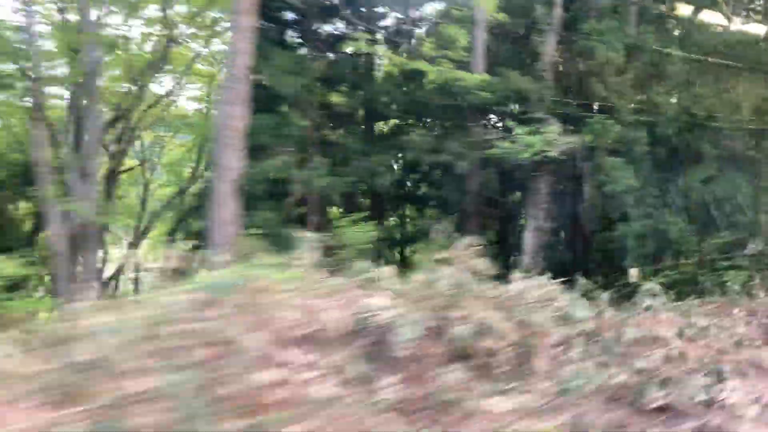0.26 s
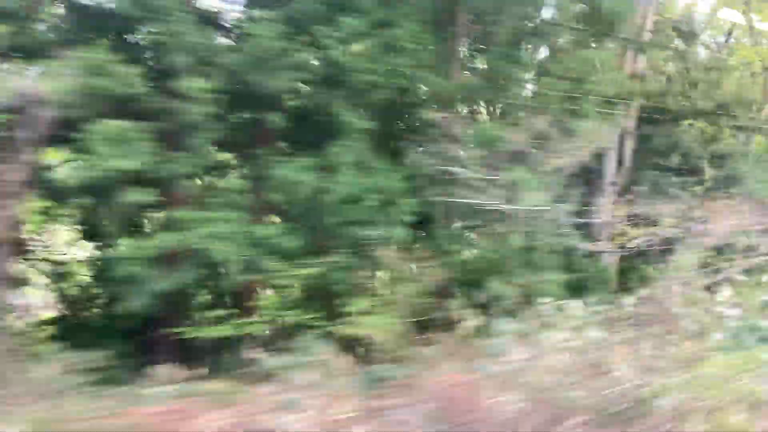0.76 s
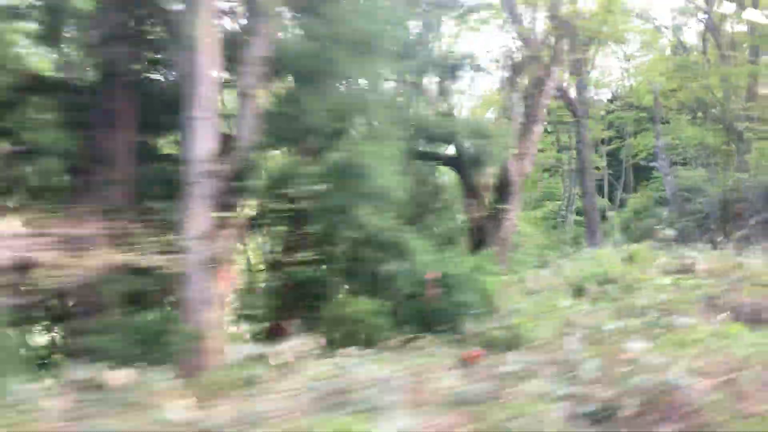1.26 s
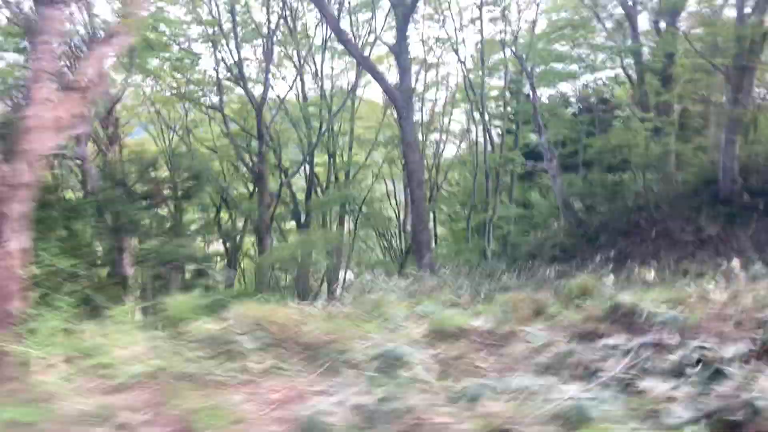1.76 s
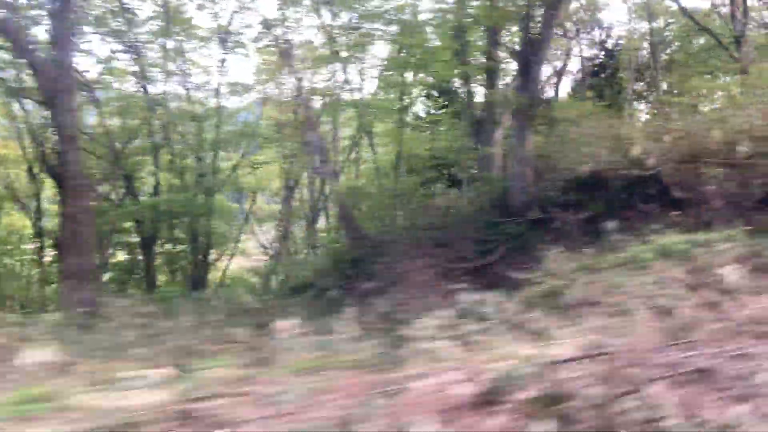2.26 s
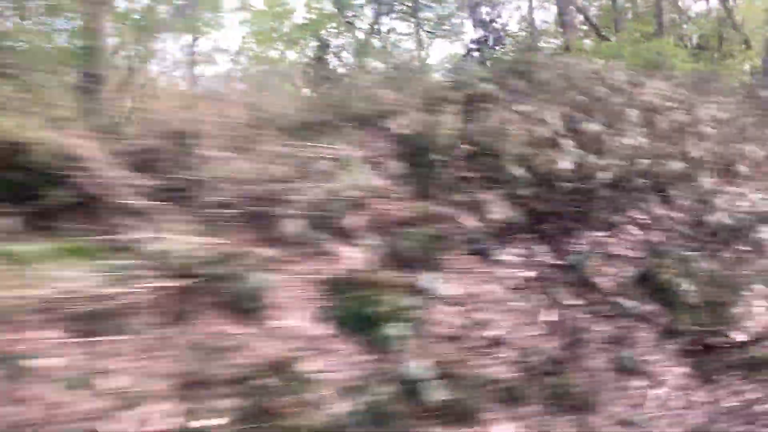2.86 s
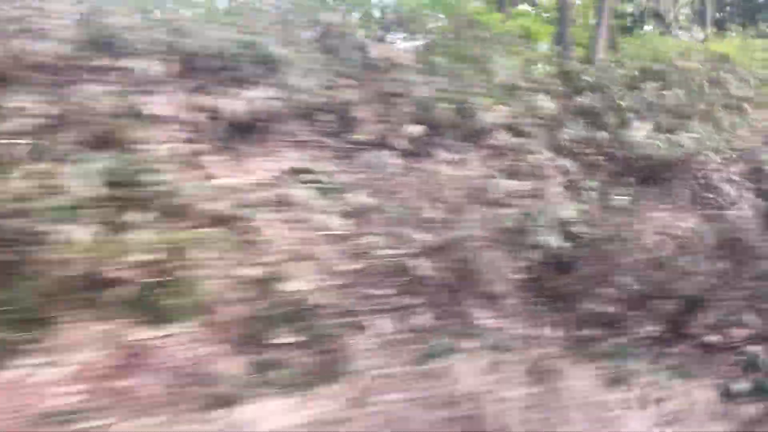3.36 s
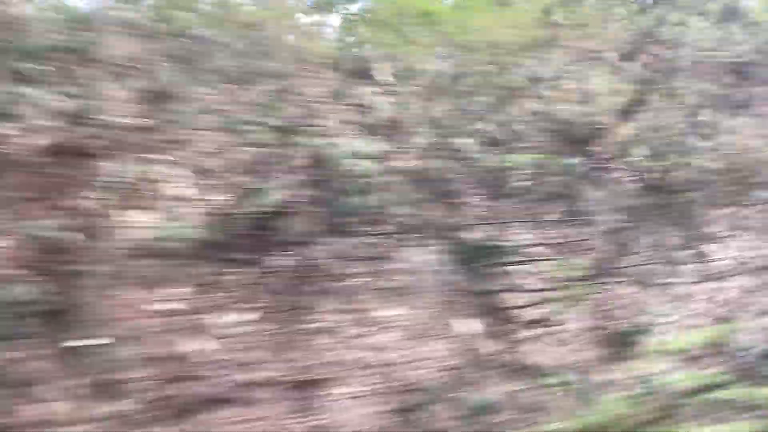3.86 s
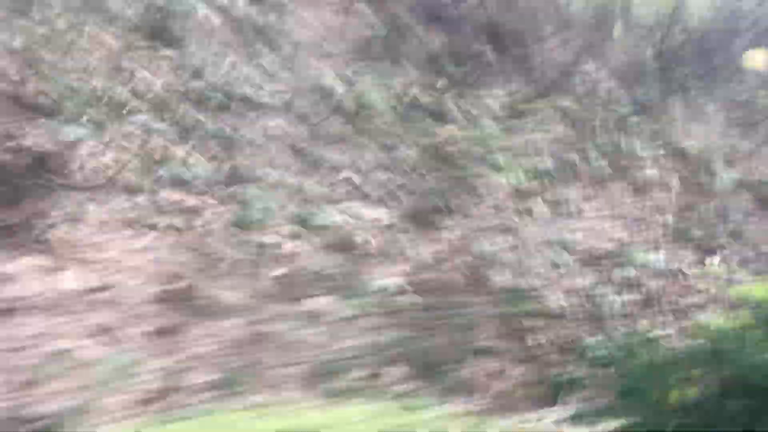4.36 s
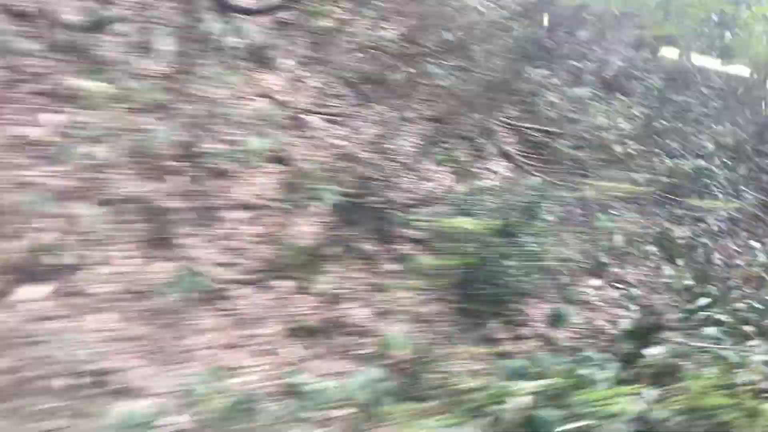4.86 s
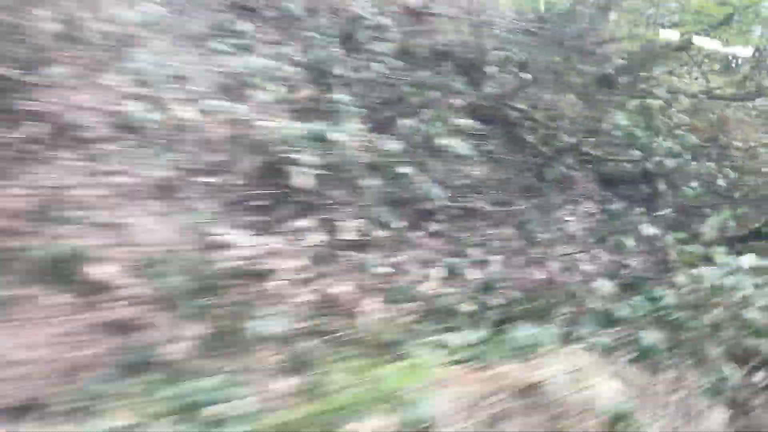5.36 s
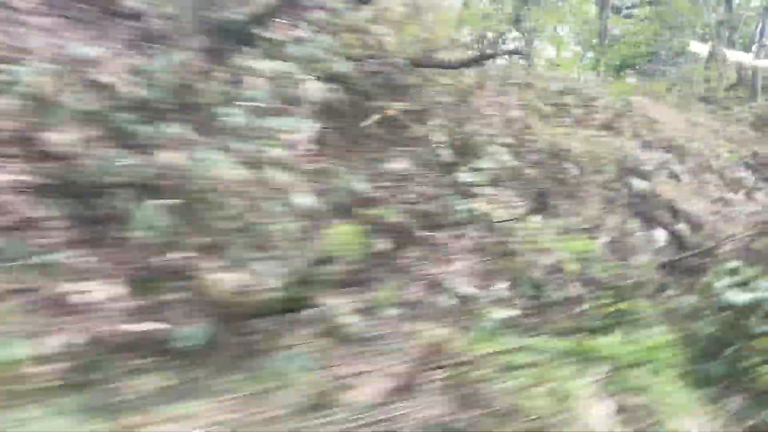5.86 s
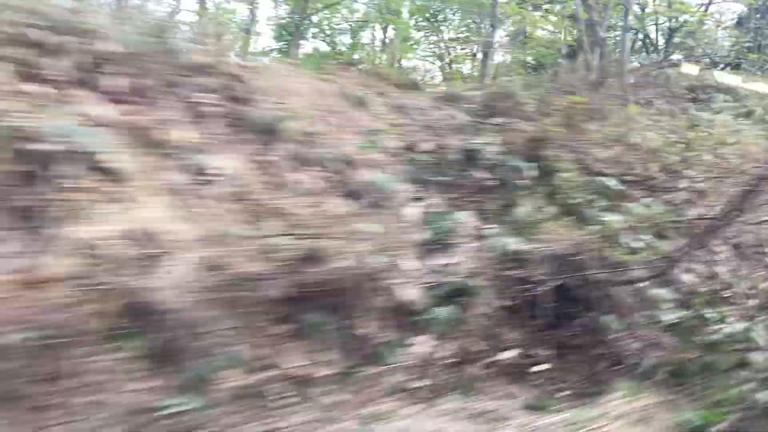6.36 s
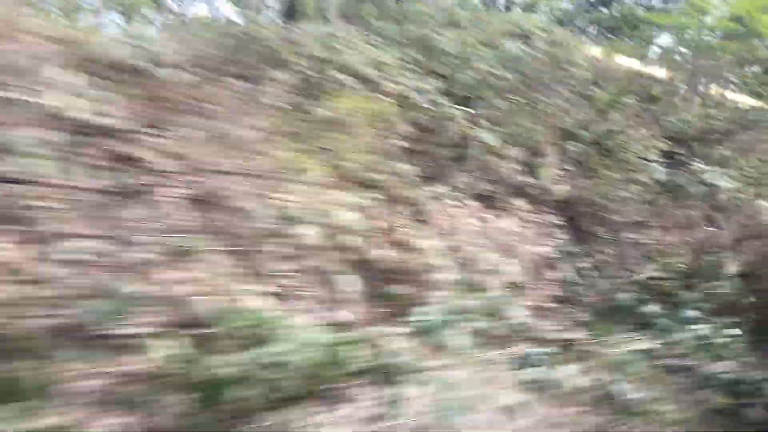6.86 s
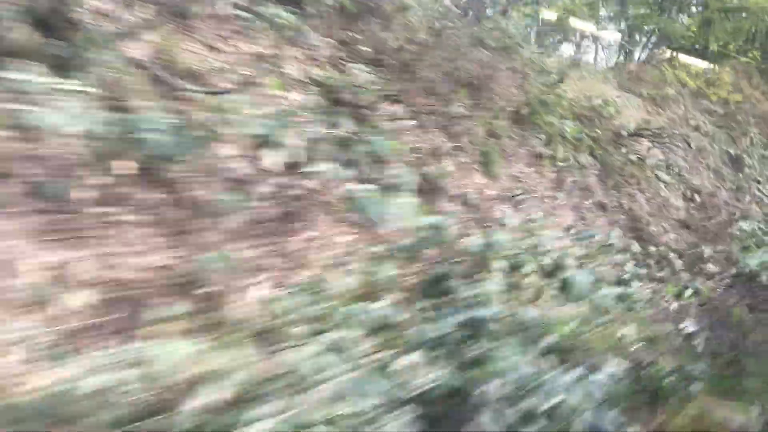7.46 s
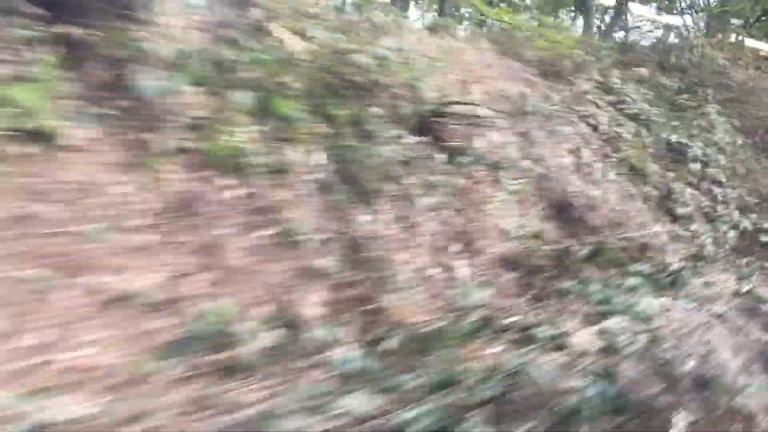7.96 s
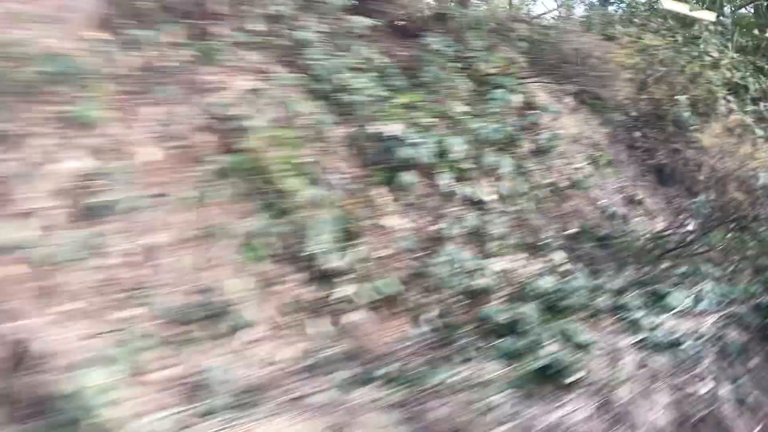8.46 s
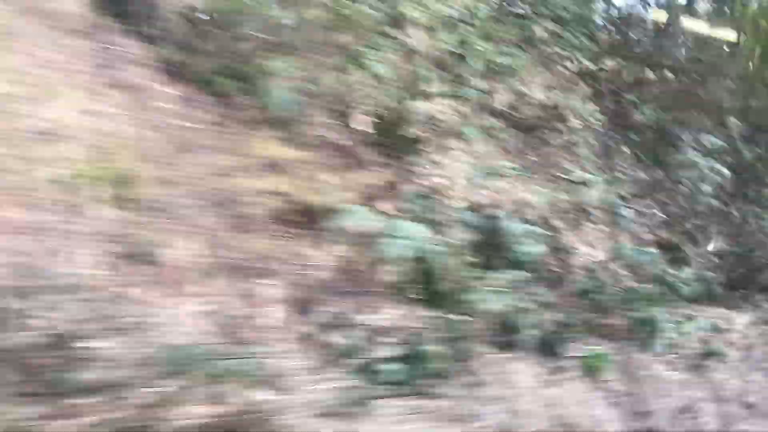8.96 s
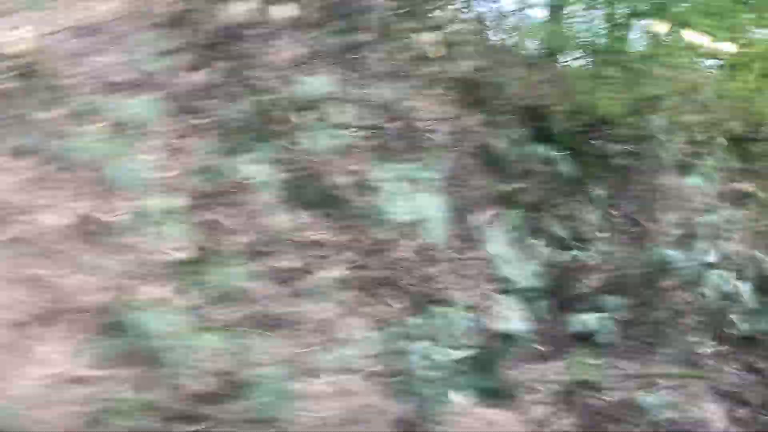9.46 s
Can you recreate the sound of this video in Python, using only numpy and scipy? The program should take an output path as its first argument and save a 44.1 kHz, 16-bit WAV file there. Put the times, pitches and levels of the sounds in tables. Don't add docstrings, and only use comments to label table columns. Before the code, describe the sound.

Inside a rolling electric train carriage, a phone held at the window picks up constant low rumble, wheel roar, soft hiss and an unsteady drive hum. Paired axle thuds over rail joints recur, with light trim rattle and faint squeaks. After three seconds a quick cluster of hard knocks hits the glass, momentarily dipping the background; a lone knock follows at six and a duller one past nine.

```python
import sys
import numpy as np
from scipy import signal
from scipy.fft import rfft, irfft, next_fast_len
from scipy.io import wavfile
from scipy.ndimage import uniform_filter1d, map_coordinates

SR = 44100
rng = np.random.default_rng(int(sys.argv[2]) if len(sys.argv) > 2 else 0)


def persist_wave(psi):
    counts = np.round(np.clip(psi, -1, 1) * 32767).astype(np.int16)
    wavfile.write(sys.argv[1], SR, np.atleast_2d(counts).T)


def convert_level_to_amplitude(level_db):
    exponent = np.asarray(level_db, float) / 20
    return 10 ** exponent


N = 428211

# (frequency [Hz], likeness [0..1])
LIKENESS = [(60, 0.95), (700, 0.85), (1000, 0.64), (1600, 0.33), (2300, 0.05), (4800, 0.027), (5600, 0.6),
            (7000, .85), (8800, 1)]
# (time [s], crack [dB], pitch factor [1], duck [dB], hold [s])
HARD_KNOCKS = [
    (3.068, -10, 0.99, 1.5, .05),
    (3.227, -3, 0.94, 7.5, 0.1),
    (3.359, -13, 0.84, 2, 0.063),
    (3.568, -2.5, 0.98, 6, .13),
    (3.7011, -2, 0.93, 9, 0.12),
    (6.142, -4.5, 0.96, 8, 0.075),
]


def unit(x):
    return x / np.sqrt(np.mean(x ** 2) + 1e-20)


def along(points, hz):
    f, v = np.transpose(points)
    return np.interp(np.log(hz + 1), np.log(f + 1), v)


def curves(rows):
    s, *cols = np.transpose(rows)
    return [np.interp(np.arange(N) / SR, s, c) for c in cols]


def wobble(rate):
    knots = rng.standard_normal(int(N * rate / SR) + 4)
    return map_coordinates(knots, [np.arange(N) * rate / SR])


def filtered(x, response):
    m = next_fast_len(N + 8192)
    return irfft(rfft(x, m) * response(np.fft.rfftfreq(m, 1 / SR)), m)[..., :N]


def diffuse_angle(hz):
    return np.arccos(np.clip(along(LIKENESS, hz), -1, 1)) / 2


def rush(spectrum, patchy_db):
    z = signal.stft(rng.standard_normal((2, N)), nperseg=512)[2]
    field = uniform_filter1d(rng.standard_normal(z.shape[1:]), size=4, axis=0)
    field = uniform_filter1d(field, size=10, axis=1)
    pair = signal.istft(z * convert_level_to_amplitude(patchy_db * unit(field)), nperseg=512)[1][:, :N]

    def response(hz):
        angle = diffuse_angle(hz)
        return convert_level_to_amplitude(along(spectrum, hz)) * [np.cos(angle), np.sin(angle)]

    mid, side = filtered(pair, response)
    return unit(np.array([mid + side, mid - side]))


def tone(hz, wander_hz, rate):
    return np.sqrt(2) * np.sin(2 * np.pi * np.cumsum(hz + wander_hz * wobble(rate)) / SR)


def track():
    # (time [s], rail roughness [dB], sound thrown back by the lineside bank [dB])
    rail = [(0.0, -18, -1), (0.46, -13.5, -1.5), (0.7, -22, 3.5), (1.2, -18, 0), (1.7, -19, 2),
            (2.43, -21, 0), (2.84, -20, 1.5), (3.2, -21, 4), (4.08, -20, 0), (4.38, -17.5, -3.5),
            (4.87, -28, 3.5), (5.22, -23.5, 1), (5.68, -14, -4.5), (6.3, -21, -1.5), (7.03, -21, -2.5),
            (7.9, -24.5, 0.5), (8.7, -20.5, 3.5), (9.71, -15.5, -2)]
    rough_db, bank_db = curves(rail)
    more_db = rough_db + 21
    roar_db = -24.5 + 0.9 * more_db + bank_db
    hiss_db = -38.5 + 0.66 * more_db + 0.46 * bank_db
    hum_db = -30.5 + 0.29 * more_db
    return rough_db, roar_db, hiss_db, hum_db


def rolling():
    # (frequency [Hz], density [dB per Hz])
    floor_colour = [(15, -32), (30, -30.5), (44, -32), (58, 3.5), (72, -7), (113, -1.5), (140, -5),
                    (215, -4), (266, -4), (330, -9), (450, -12), (650, -29.5), (1100, -120)]
    wall_colour = [(150, -23), (250, -5), (323, -14), (419, -9), (445, -11.5), (495, -6.5), (545, -8.5),
                   (629, -11), (901, -18.5), (1500, -30), (1950, -74), (3300, -120)]
    seal_colour = [(530, -34.5), (900, -26.5), (1400, -5.5), (2000, -6.5), (3000, -12), (4300, -21),
                   (5600, -27.5), (8000, -33.5), (11000, -38.5), (14500, -49), (15800, -57.5)]
    rumble_db, roar_db, hiss_db, _ = track()
    rough = wobble(9)
    rumble_gain = convert_level_to_amplitude(rumble_db + 0.6 * rough + 0.9 * wobble(18))
    roar_gain = convert_level_to_amplitude(roar_db + 0.6 * rough + 0.5 * wobble(15))
    hiss_gain = convert_level_to_amplitude(hiss_db + rough)
    rumble = rumble_gain * rush(floor_colour, patchy_db=-0.8)
    roar = roar_gain * rush(wall_colour, patchy_db=1.1)
    return rumble + roar + hiss_gain * rush(seal_colour, patchy_db=1.7)


def axles():
    # (time [s], leading axle [dB], trailing axle [dB], weight on floor [dB], trim shaken [dB])
    near_bogie = [
        (0.2437, -24.5, -20, 2.5, -4),
        (1.5284, -24, -20, 2, 1.5),
        (2.828, -27, -21, 2.5, 5.5),
        (4.138, -26, -23.5, -7, 3.5),
        (5.456, -25, -21, -3, 2),
        (6.788, -27, -25, -12.5, -6.5),
        (8.11, -26, -21, 2, 4),
        (9.417, -21, -18.5, -3, 6.5),
    ]
    next_bogie = [
        (0.5885, -27.5, -44.5, 7, 1),
        (1.8587, -23.5, -33, -9.5, -5),
        (3.1608, -23, -39, 1.5, 4),
        (4.4614, -25.5, -31, -1.5, 9),
        (5.7874, -23, -33, -3.5, -2.5),
        (7.1204, -25.5, -29, 0.5, -6),
        (8.4426, -26.5, -26, -2, -7),
    ]
    # (time [s], level [dB], weight on floor [dB], trim shaken [dB])
    jolts = [(0.079, -34.5, -1, -14), (0.4439, -32, -3, -1), (0.525, -35, 16, -5), (0.7694, -47, 11, 16),
             (0.9985, -31.5, 6, -3), (1.106, -40, -8, -2), (1.3592, -42, -6, -1), (1.58, -23, -4, 7),
             (1.81, -29.5, -13, 7), (2.133, -40, 15, -3), (2.3364, -32, -3, -4), (2.5002, -45, 8, -6),
             (2.88, -32.5, -4, 13), (3.471, -27.5, 10.5, 0), (4.3495, -35, 14, 16), (4.6484, -32.5, -3, -2),
             (4.7995, -30.5, 3, 16), (5.169, -34, 7.5, 5.5), (5.625, -29, 0, 13), (6.331, -37.5, 12, -5),
             (6.6391, -39, -5, 1.5), (8.726, -28.5, 7, 3.5), (9.0938, -40.5, 15, 6),
             (9.168, -35.5, 13.5, 5), (9.2488, -34, 5.5, 1.5), (9.632, -30, 18, 5.5)]
    jolt_t60_s = 0.32
    trail_weight_db, trail_trim_db = 0.5, 0
    blows = [(s, db, weight_db, trim_db, jolt_t60_s) for s, db, weight_db, trim_db in jolts]
    # bogie, axle spacing s, leading and trailing t60 s
    passes = ((near_bogie, 0.11, 0.56, 0.37), (next_bogie, 0.122, 0.4, 0.56))
    for bogies, apart_s, lead_t60_s, trail_t60_s in passes:
        for s, lead_db, trail_db, weight_db, trim_db in bogies:
            blows.append((s, lead_db, weight_db, trim_db, lead_t60_s))
            blows.append((s + apart_s, trail_db, weight_db + trail_weight_db,
                          trim_db + trail_trim_db, trail_t60_s))
    return blows


def joints():
    # (frequency [Hz], density [dB per Hz])
    clank_colour = [(530, -28.5), (900, -17), (1100, -3), (1600, -13.5), (2300, -8.5), (3200, -17),
                    (4300, -26), (5600, -30.5), (7500, -42.5), (12000, -119)]
    thud_colour = [(180, -35), (300, 0.5), (429, -9.5), (494, -0.5), (613, -5), (664, -17), (735, -9.5),
                   (968, -19), (1340, -31.5), (1500, -23.5), (1950, -58), (3300, -120)]
    boom_colour = [(24, -37.5), (40, -6), (103, 2.5), (183, -7.5), (208, 3.5), (235, -16.5), (263, 1),
                   (319, -11.5), (346, -7.5), (375, -19), (450, -5), (580, -31), (990, -120)]
    rattle_colour = [(2500, -45), (4500, 6), (5600, -6.5), (7000, 0), (8500, -8), (11000, -8.5),
                     (14500, -20.5), (15800, -33.5)]
    t = np.arange(SR // 2) / SR
    rise_s = np.array([[0.006], [0.012], [0.018], [0.006]])
    rise = 1 - np.exp(-t / rise_s)
    swell = np.zeros((4, N + SR))
    for s, db, weight_db, trim_db, t60_s in axles():
        thud_db = 12 - 0.22 * weight_db
        levels_db = db + np.array([[-4.5], [thud_db], [10 + weight_db], [-24.5 + trim_db]])
        swell[:, round(s * SR):][:, :len(t)] += (convert_level_to_amplitude(levels_db - 60 * t / t60_s) * rise) ** 2
    colours = (clank_colour, thud_colour, boom_colour, rattle_colour)
    layers = zip(np.sqrt(swell[:, :N]), colours)
    return sum(gain * rush(colour, patchy_db=2.2) for gain, colour in layers)


def drive():
    # (time [s], shaft speed [turns/s])
    shaft = [(0, 54.6), (9.71, 53.2)]
    # (multiple [1], level [dB])
    orders = [(1, 0), (2, -3), (3, -2.5), (4, -1), (5, -1.5)]
    # (start frequency [Hz], end frequency [Hz], level over roar [dB], wander [Hz])
    gears = [(748, 740, -16, 9), (3250, 3080, -36.5, 8), (1515, 1460, -32, 9)]
    # (time [s], length [s], frequency [Hz], level [dB])
    squeaks = [
        (.03, .3, 2290, -48),
        (4.53, .1, 2260, -43),
        (4.64, .06, 2240, -46),
        (4.89, .14, 1985, -44),
        (5.045, .06, 1985, -43),
        (4.8, .07, 4030, -56),
        (9.0, .3, 3210, -54),
    ]
    turns, t = curves(shaft)[0], np.arange(N) / SR
    _, roar_db, _, hum_db = track()
    hum, mesh, squeal = np.zeros((3, N))
    for k, db in orders:
        hum += convert_level_to_amplitude(db + 2.5 * wobble(5)) * tone(k * turns, 2, 8)
    for start_hz, end_hz, db, wander_hz in gears:
        line = tone(np.linspace(start_hz, end_hz, N), wander_hz, 12)
        mesh += convert_level_to_amplitude(db + roar_db + 2.5 * wobble(6)) * line
    for s, span_s, hz, db in squeaks:
        envelope = np.sin(np.pi * np.clip((t - s) / span_s, 0, 1))
        squeal += convert_level_to_amplitude(db + 2.5 * wobble(25)) * envelope * tone(hz, 6, 20)
    return convert_level_to_amplitude(hum_db) * hum + mesh + squeal


def knocks():
    # (frequency [Hz], width [Hz], level [dB])
    pane = [(274, 190, -6.5), (515, 133, 5.5), (1130, 170, -4)]
    # (time [s], peak [dB], crack [dB], pitch factor [1])
    taps = [
        (3.253, -10.5, -20, 1),
        (3.377, -15.5, -24.5, 0.99),
        (3.582, -10.5, -18.5, 0.88),
        (3.713, -13.5, -8.5, 0.94),
        (3.721, -16, -15, 0.68),
        (9.284, -3, -15.5, 0.74),
        (9.3, -7.5, -24, 0.34),
    ]
    knock_db = -1
    hits = [(s, knock_db, crack_db, pitch) for s, crack_db, pitch, _, _ in HARD_KNOCKS]
    out, t = np.zeros(N + 4096), np.arange(2048) / SR
    hz = np.fft.rfftfreq(4096, 1 / SR)
    dispersion = np.exp(-0.8j * np.sqrt(hz))
    for s, db, crack_db, pitch in hits + list(taps):
        f = hz / pitch
        body = 0
        for k, (centre_hz, width_hz, mode_db) in enumerate(pane):
            damping = 1j * f * width_hz
            body = body + (-1) ** k * convert_level_to_amplitude(mode_db) * damping / (centre_hz ** 2 - f ** 2 + damping)
        body = body / (1 + (f / 1800) ** 2)
        crack = convert_level_to_amplitude(crack_db - 10) * (1 / (1 + (hz / 2700) ** 6) + 0.003) * hz / (hz + 1200)
        scatter = convert_level_to_amplitude(-32 - 60 * t / 0.058) * rng.standard_normal(2048) * (t > 0.004)
        wave = irfft((body * (1 + rfft(scatter, 4096)) + crack) * dispersion)
        out[round(s * SR):][:2048] += convert_level_to_amplitude(db) * wave[:2048] / np.abs(wave).max()
    return out[:N]


def scrapes():
    # (time [s], length [s], frequency [Hz], level [dB])
    rubs = [(.35, 0.044, 3000, -48), (1.6, 0.093, 3040, -38.5), (4.255, 0.056, 320, -15),
            (4.47, 0.083, 552, -21), (4.62, 0.078, 1480, -37), (5.47, 0.071, 279, -17.5),
            (5.79, .06, 620, -19), (5.84, .06, 4470, -43), (6.787, 0.042, 2500, -39),
            (7.24, 0.035, 2500, -38), (8.119, .12, 270, -18.5), (8.54, .1, 2200, -43), (8.6, .5, 866, -40),
            (8.69, .08, 2170, -41), (8.81, 0.067, 2320, -41), (9.155, .03, 2700, -36),
            (9.245, .025, 3000, -34.5), (9.3, .12, 270, -19)]
    half_width = 0.11
    out = np.zeros((2, N))
    for s, span_s, hz, db in rubs:
        t = np.arange(round(span_s * SR)) / SR
        edges_hz = [hz * (1 - half_width), hz * (1 + half_width)]
        band = signal.butter(2, edges_hz, "band", fs=SR, output="sos")
        rub = unit(signal.sosfilt(band, rng.standard_normal((2, SR))))
        angle = diffuse_angle(hz)
        pair = np.cos(angle) * rub[0] + np.sin(angle) * np.array([rub[1], -rub[1]])
        envelope = convert_level_to_amplitude(db) * np.sin(np.pi * t / span_s)
        out[:, round(s * SR):][:, :len(t)] += envelope * pair[:, -len(t):]
    return out


def ticks():
    # (time [s], level [dB])
    clicks = [
        (.775, -62),
        (1.82, -58),
        (2.212, -58),
        (9.148, -56),
    ]
    out, t = np.zeros(N), np.arange(400) / SR
    for s, db in clicks:
        out[round(s * SR):][:400] += convert_level_to_amplitude(db + 17 - 60 * t / 0.015) * np.diff(rng.standard_normal(401))
    return out


def ducking():
    let_go_s, creep_s, creep_db = 0.037, 0.35, 3
    t = np.arange(N) / SR
    quick, slow = np.zeros((2, N))
    for s, _, _, duck_db, hold_s in HARD_KNOCKS:
        on = t > s + 0.006
        since_s = np.maximum(t - s - hold_s, 0)
        quick = np.maximum(quick, on * duck_db * np.exp(-since_s / let_go_s))
        slow += on * creep_db * np.exp(-since_s / creep_s)
    return convert_level_to_amplitude(-uniform_filter1d(quick + slow, size=200))


def ports(x, cycles):
    # (frequency [Hz], left minus right [dB])
    left_over_right = [(60, -1), (150, -0.7), (400, 1.5), (900, 1.5), (1500, 5), (2400, 5), (4000, 3.5),
                       (6000, 0.5)]

    def response(hz):
        half = convert_level_to_amplitude(along(left_over_right, hz) / 2) * np.exp(-1j * np.pi * cycles(hz))
        return np.array([half, 1 / half])

    return filtered(x, response)


def scene():
    # (frequency [Hz], lag [cycles])
    trail = [(0, 0), (900, .05), (1400, .35), (1950, .5), (3200, .85), (5000, 1.5), (7200, 2.02),
             (9050, 2.5), (11300, 3), (13700, 3.5), (15300, 4)]
    gain = ducking()
    airborne = ports((rolling() + joints() + ticks()) * gain,
                     lambda hz: np.interp(hz, *np.transpose(trail)))
    structure = ports(drive() * gain, lambda hz: 0 * hz)
    pane_knocks = ports(knocks(), lambda hz: hz * 0.00015)
    return airborne + structure + scrapes() * gain + pane_knocks


def roll_off(x):
    return signal.sosfilt(signal.butter(12, 15700, fs=SR, output="sos"), x)


def record(dry):
    held = dry / (1 + np.abs(dry / 0.95) ** 6) ** (1 / 6)
    return roll_off(held)


dry = scene()
out = record(dry)
persist_wave(out)
```